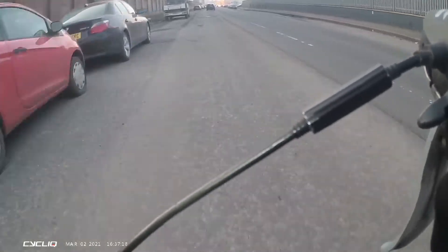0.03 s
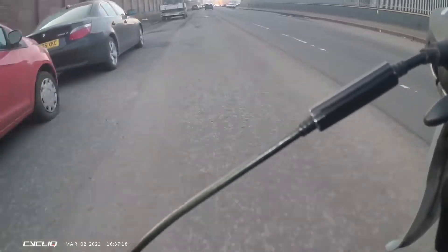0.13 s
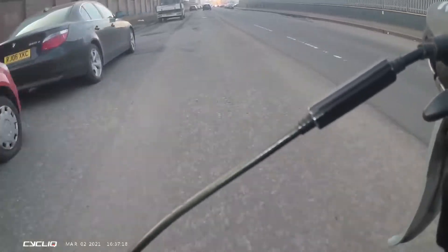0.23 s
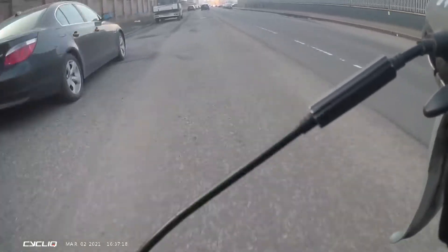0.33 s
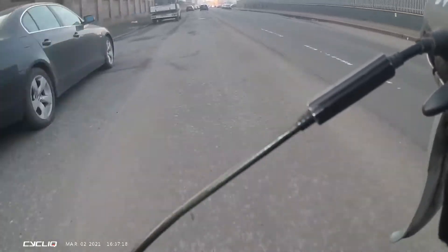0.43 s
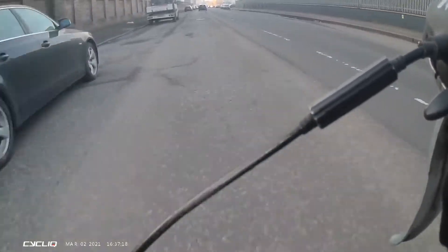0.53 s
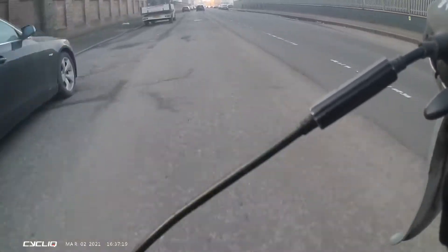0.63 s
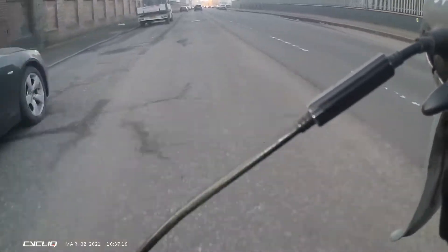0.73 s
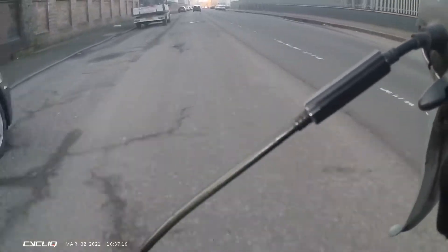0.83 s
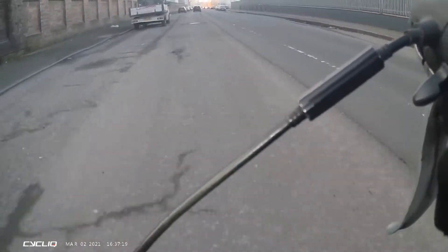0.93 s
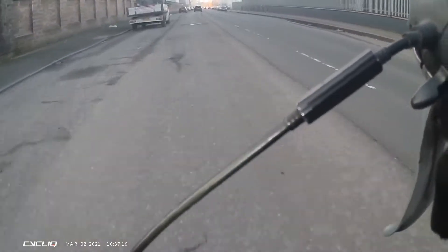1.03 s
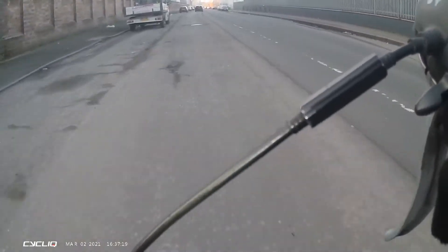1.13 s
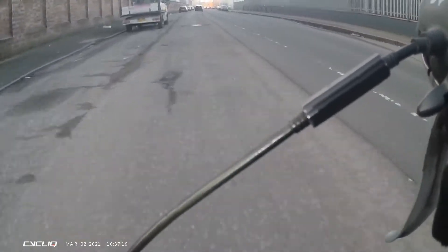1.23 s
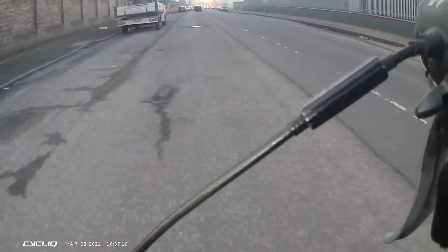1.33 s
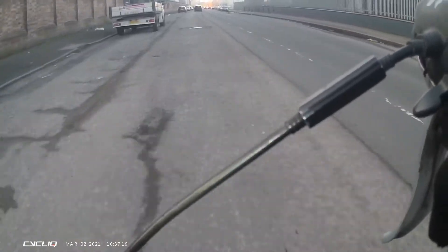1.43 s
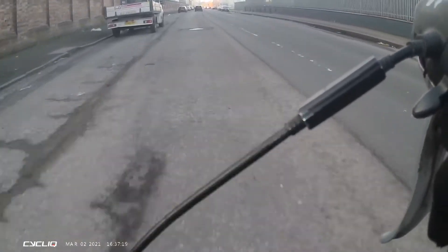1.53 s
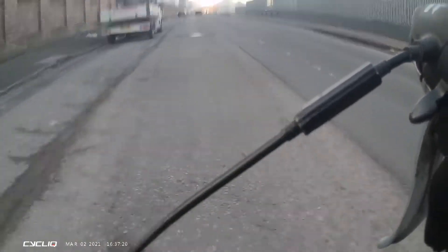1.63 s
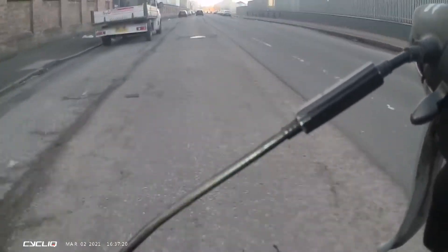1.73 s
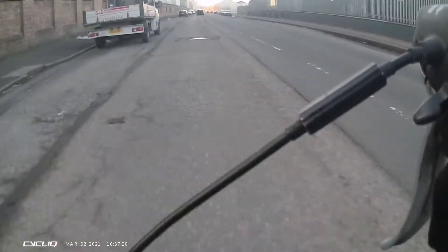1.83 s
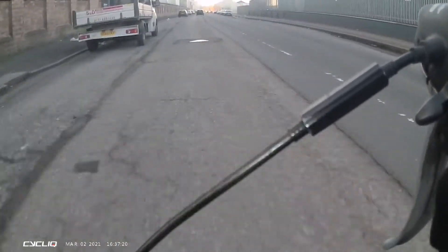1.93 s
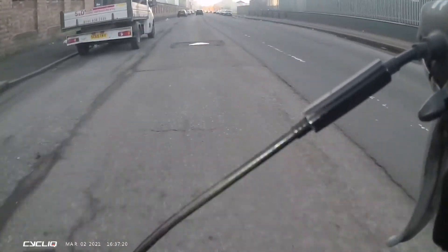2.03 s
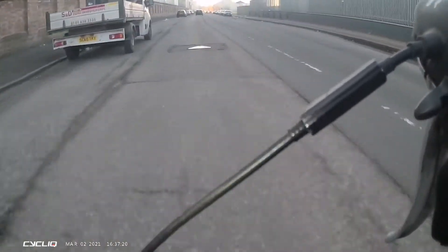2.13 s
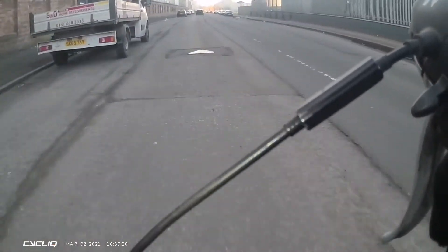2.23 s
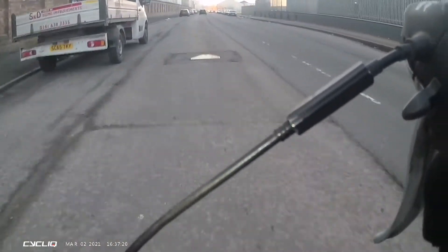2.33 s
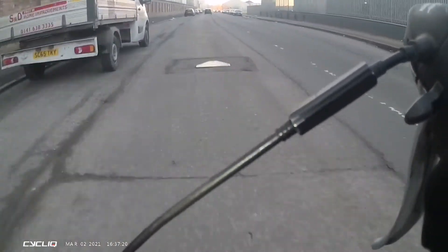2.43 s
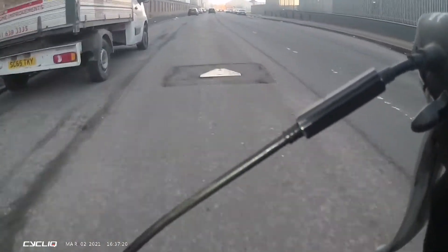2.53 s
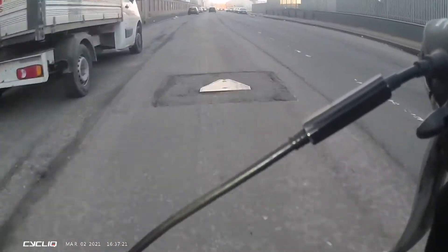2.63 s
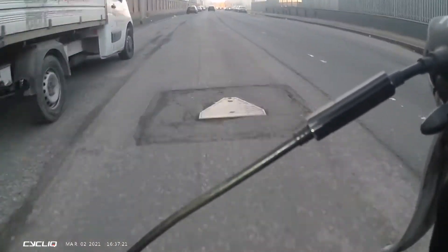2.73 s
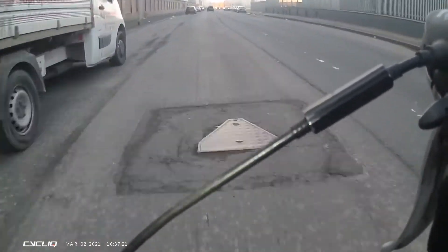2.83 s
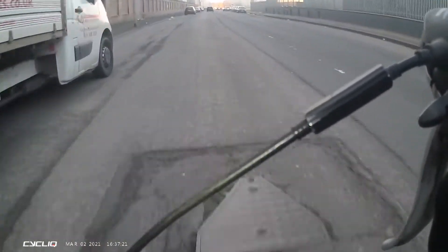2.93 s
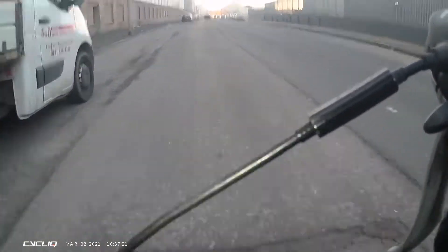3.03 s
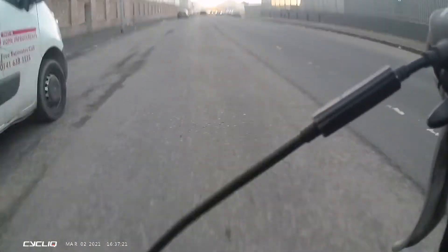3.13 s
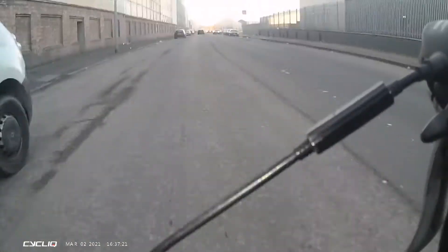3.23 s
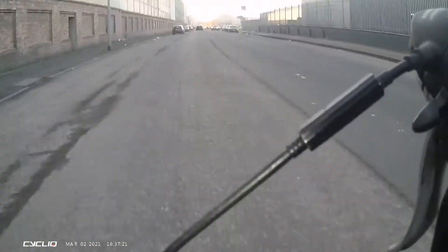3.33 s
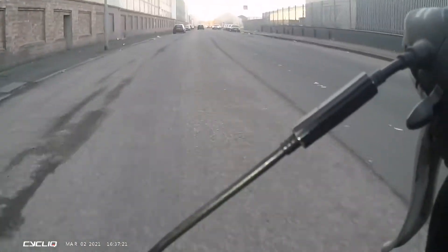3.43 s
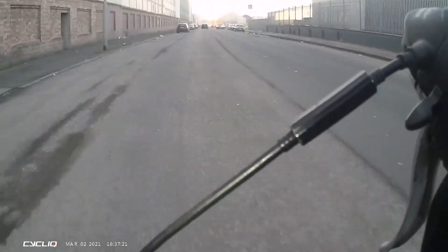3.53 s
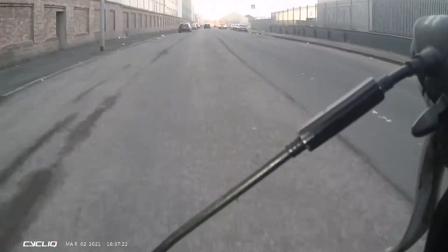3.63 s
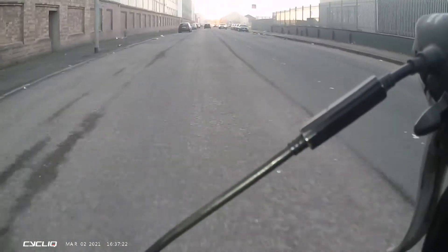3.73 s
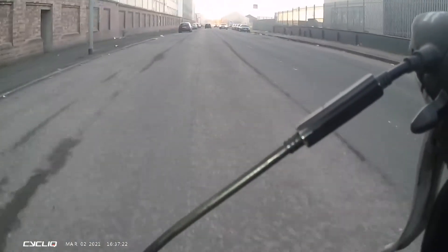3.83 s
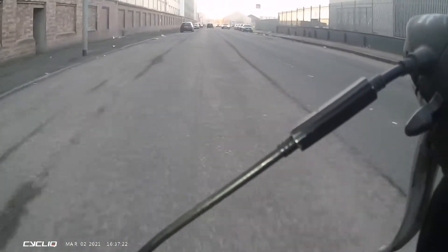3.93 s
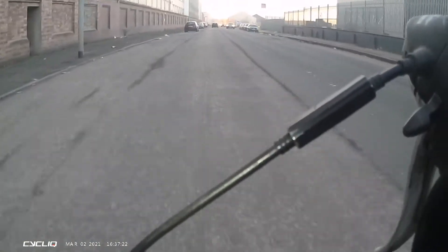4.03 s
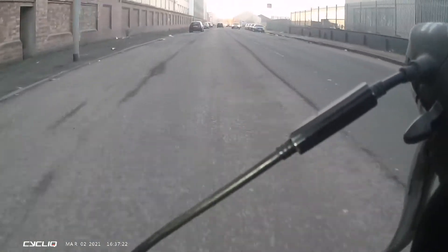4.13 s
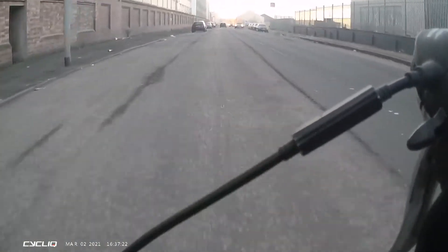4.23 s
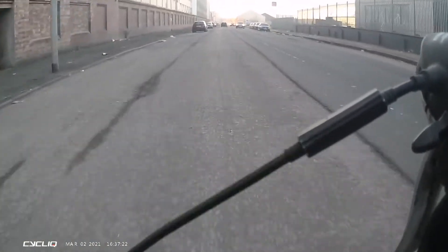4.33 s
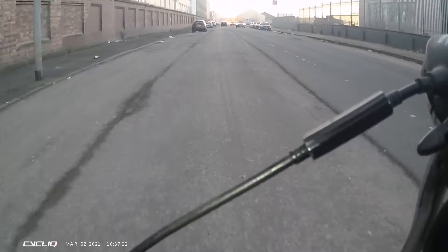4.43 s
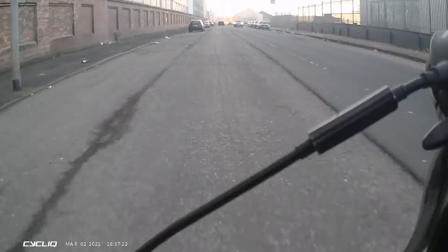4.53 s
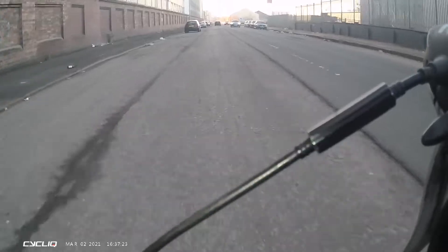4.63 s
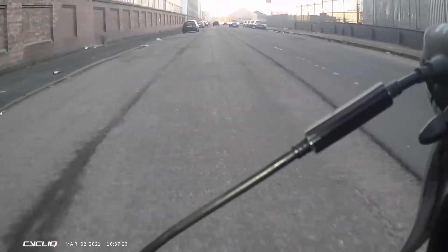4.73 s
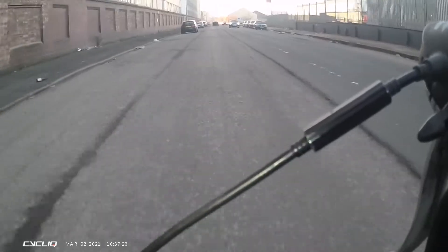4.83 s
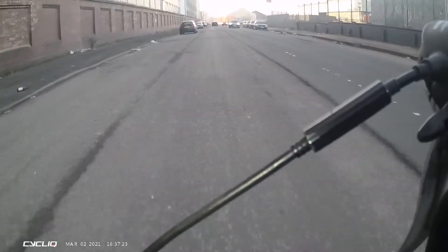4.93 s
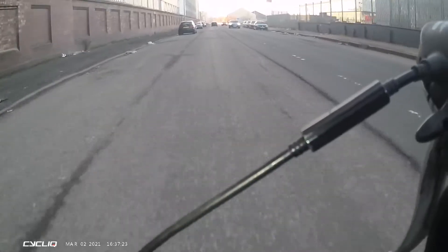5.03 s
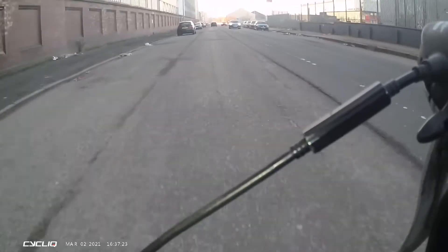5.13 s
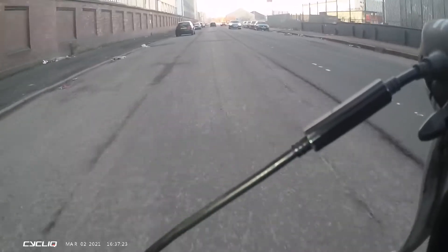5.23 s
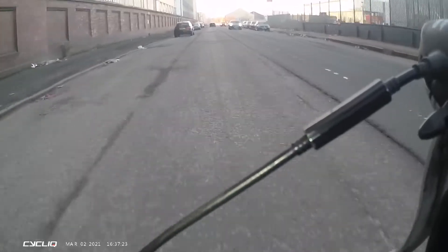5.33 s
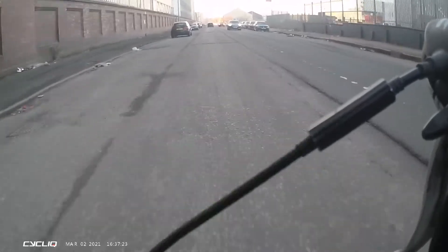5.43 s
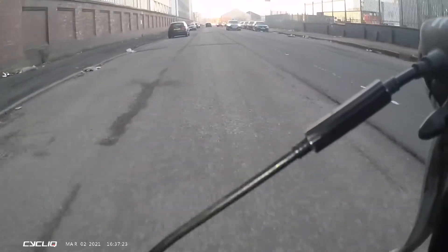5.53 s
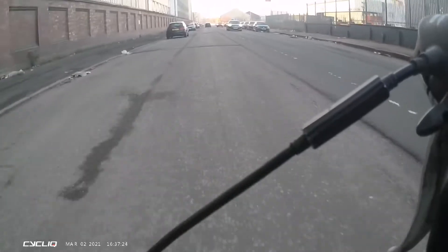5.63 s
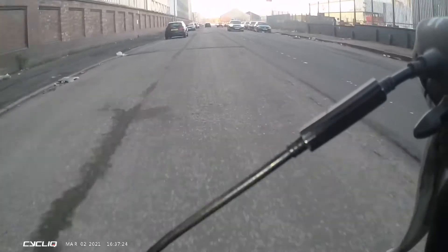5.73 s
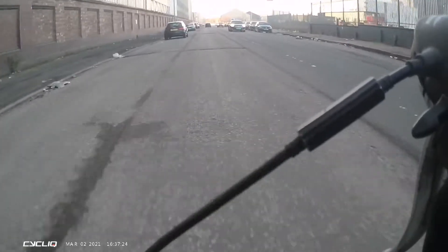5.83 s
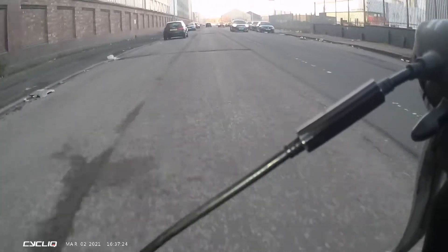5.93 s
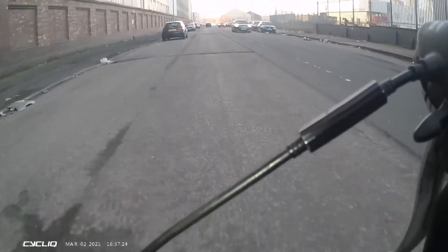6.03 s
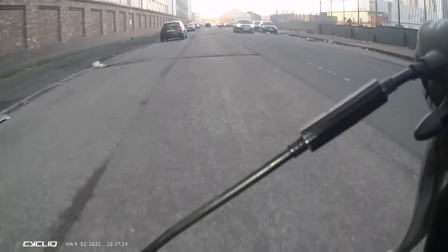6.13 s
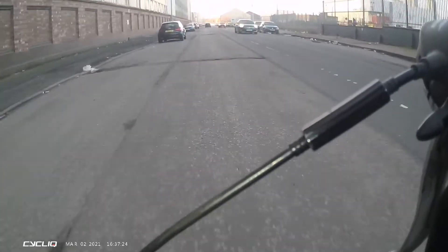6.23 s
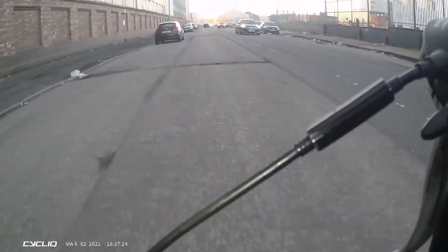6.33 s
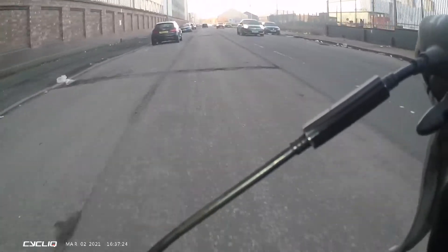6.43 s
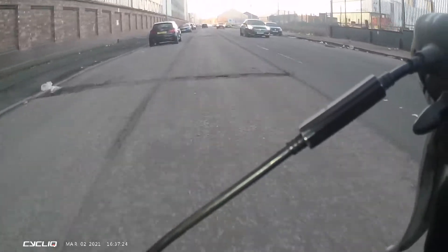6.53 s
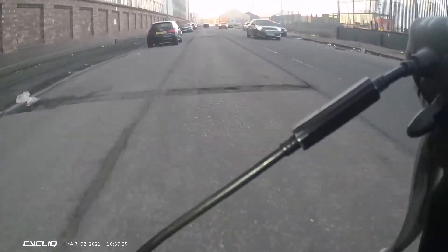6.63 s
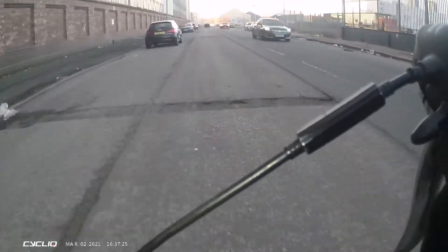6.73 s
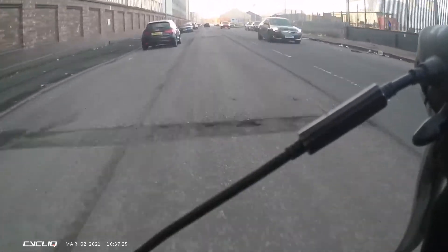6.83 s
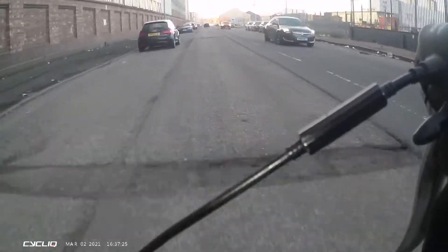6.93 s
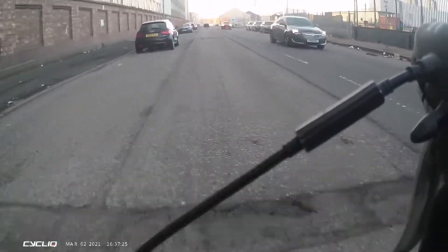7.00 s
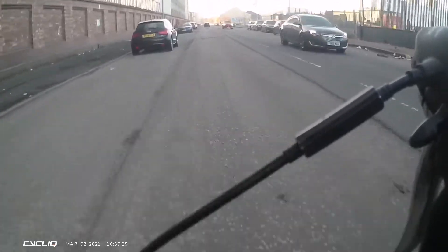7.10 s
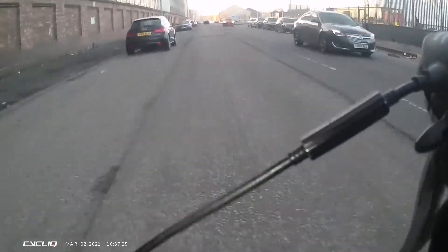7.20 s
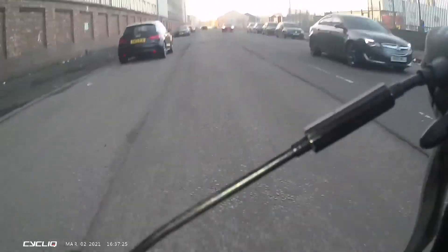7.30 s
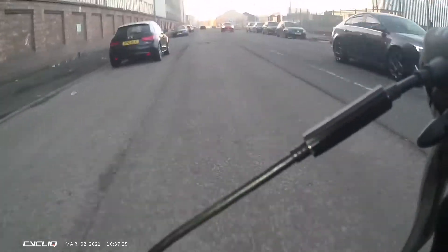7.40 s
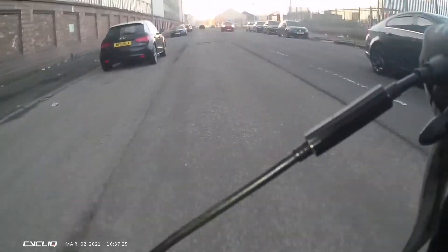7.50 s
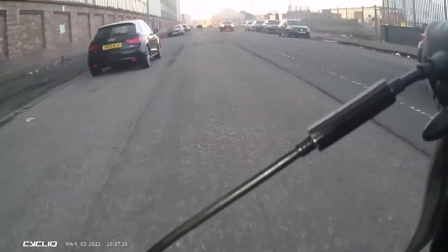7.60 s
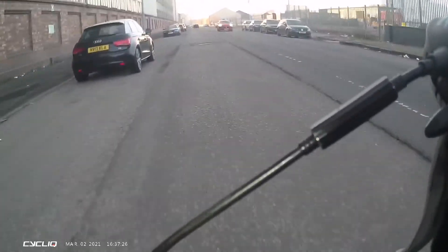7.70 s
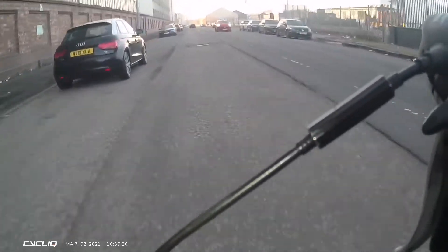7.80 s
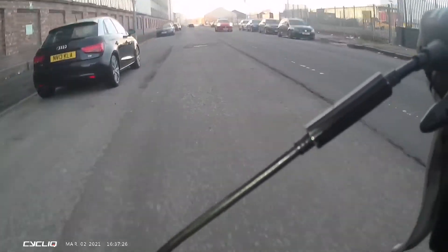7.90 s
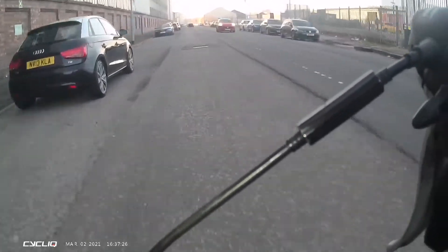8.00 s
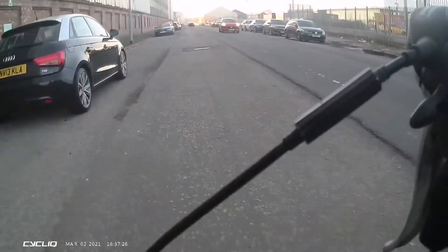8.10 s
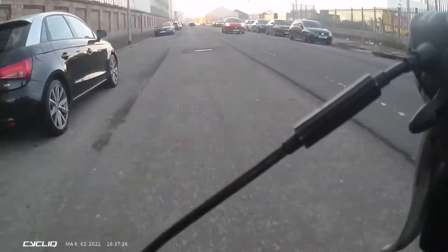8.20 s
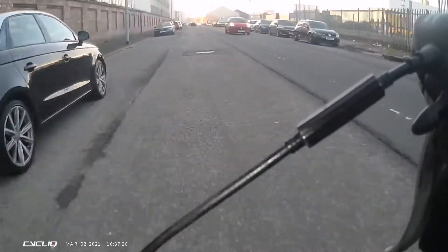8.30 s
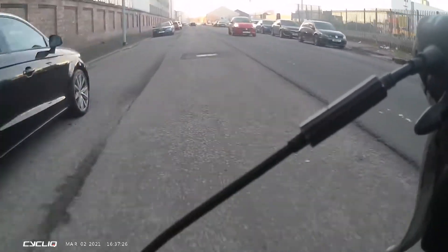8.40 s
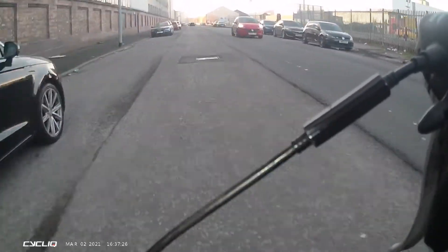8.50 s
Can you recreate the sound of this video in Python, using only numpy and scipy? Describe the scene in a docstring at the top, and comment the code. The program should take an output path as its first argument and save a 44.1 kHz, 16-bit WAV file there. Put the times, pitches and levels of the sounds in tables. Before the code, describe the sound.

A bicycle rolls steadily along a worn city street, heard close up from its handlebar. Tyres drum in a low, grainy rumble with a humming frame, finely buzzing fittings and lumpy low wind; a car's roar fades away at the start. After a faint tick at 0.4 s, a bump at 1.5-1.7 s brings thuds and sharp plastic clacks. Scattered jolts and ticks follow at 2.1-2.8 s, then the roughest stretch, 2.9-3.3 s, shakes the bike with heavy thumps, gritty crunch and rapid bright rattling. Smaller bumps come near 3.6 and 4.2 s, before mostly even rolling with slight roughness. From about 6 s an oncoming car gradually swells. A hard double-edged jolt at 7.1-7.3 s sets off another dense clatter, then a hollow loose knock at 7.5 s. The car is nearest around 7.7 s and recedes as the tyre drone continues to 8.5 s.

```python
"""A bicycle rolls on worn asphalt, heard at two microphone ports on its handlebar: stones drum on the tyres
and keep the frame droning. Rough patches raise the vibration, the buzz of fittings and the wind.
Edges ring the frame and set off clatter; fittings clack on the plastic mount and a loose part knocks.
Behind lie lumpy low wind noise and the roar of two oncoming cars, one fading, one swelling late.
Noise and random contacts drive spectra and ringing modes."""
import sys
import numpy as np
from scipy import signal
from scipy.fft import rfft, irfft, next_fast_len
from scipy.io import wavfile

SR = 44100
rng = np.random.default_rng(int(sys.argv[2]) if len(sys.argv) > 2 else 0)


def digitize_waveform(pressure):
    """Quantize a signal to 16-bit integers and store it at the path in sys.argv[1].

    Rows of a 2-D input are taken as channels; values are limited to [-1, 1].
    """
    field = np.atleast_2d(pressure).T
    bounded = np.clip(field, -1, 1)
    quanta = np.round(bounded * 32767).astype(np.int16)
    wavfile.write(sys.argv[1], SR, quanta)


N = 377496

# All dB values are relative to later layer gains.
# Tyre drumming spectrum: frequency_hz, density_db_per_hz
ROAD_SPECTRUM = [(70, -30), (120, -6), (150, -2.5), (200, -9), (270, -8.5), (330, -3.5), (400, 0),
                 (480, -3.5), (680, -15.5), (900, -18.5), (1200, -30), (2500, -36.5), (5000, -58)]
# Rough asphalt: start_s, length_s, extra_vibration_db
ROUGH_PATCHES = [(0.12, 0.3, 1.5), (1.05, 0.02, 3.5), (1.563, 0.13, 4.5), (2.036, 0.26, 1.5),
                 (2.587, 0.096, 3.5), (2.916, 0.36, 5), (3.574, 0.069, 4.5), (4.192, 0.059, 4.5),
                 (4.52, 0.16, 2.5), (5.427, 0.034, 2), (6.917, 0.075, 3.5), (7.092, 0.18, 6.5)]
# Fittings buzz spectrum: frequency_hz, density_db_per_hz
BUZZ_SPECTRUM = [(400, 6), (900, -7.5), (1600, 7.5), (2500, 3), (4100, 2.5), (4700, 7), (5500, 3.5),
                 (6400, 1), (8000, -4.5), (9700, -4), (12500, -15.5), (16000, -85)]
# Fittings striking the mount: start_s, level_db, chatter_s, pitch_hz
CLACKS = [(0.371, -30.5, 0.00077, 5100), (1.5755, -15, 0.002, 6500), (1.581, -8.5, 0.0026, 5500),
          (1.5995, -28, 0.00039, 5200), (1.6187, -24, 0.001, 6950), (1.620, -21, 0.0021, 3300),
          (1.689, -22, 0.0018, 5300), (1.7135, -21.5, 0.00075, 1980), (1.7136, -24, 0.002, 5570),
          (1.857, -24.5, 0.0007, 5830), (2.089, -13.5, 0.00088, 5550), (2.39, -19.5, 0.0013, 6600),
          (2.403, -33, 0.00099, 6900), (2.538, -23.5, 0.004, 4600), (2.608, -22, 0.0032, 4580),
          (2.652, -23, 0.0044, 4400), (2.7372, -24, 0.00027, 4840), (2.7422, -10.5, 0.001, 5670),
          (2.783, -20.5, 0.00031, 5660), (2.934, -7, 0.0025, 5800), (2.9627, -16, 0.0018, 7500),
          (2.974, -26, 0.0012, 2000), (2.994, -13, 0.0035, 4800), (3.0133, -23, 0.0014, 7600),
          (3.046, -13, 0.00073, 5600), (3.071, -10, 0.0019, 6150), (3.0788, -11, 0.0029, 5100),
          (3.09, -14, 0.0011, 5000), (3.113, -19.5, 0.00087, 4500), (3.118, -9.5, 0.00088, 6200),
          (3.1572, -12, 0.0018, 4930), (3.1893, -15.5, 0.0012, 6300), (3.206, -16, 0.00084, 5800),
          (3.2195, -6, 0.0018, 5900), (3.248, -17, 0.0026, 4370), (3.5534, -26.5, 0.0011, 6130),
          (4.442, -26, 0.00049, 5500), (4.685, -28, 0.00054, 4940), (6.934, -25, 0.001, 5440),
          (6.944, -25, 0.00058, 5430), (7.1029, -8.5, 0.002, 7240), (7.118, -16, 0.001, 5000),
          (7.18, -10.5, 0.0034, 5040), (7.2128, -17, 0.0014, 5500), (7.225, -16, 0.004, 6000),
          (7.2437, -7.5, 0.0018, 6000), (7.2495, -8, 0.0023, 4840), (7.256, -10.5, 0.00067, 5000),
          (7.297, -19, 0.00095, 5740), (7.301, -22, 0.002, 4600), (7.3345, -18.5, 0.00028, 5000)]
# Plastic mount and housing: frequency_hz, level_db, t60_s, left_lead_rad
MOUNT_MODES = [(4180, 5.5, 0.0042, 0.91), (4880, 13, 0.0011, 1.7), (5900, 13, 0.0046, 3),
               (7200, 11.5, 0.0032, 3.2), (8900, 0, 0.002, 1.23), (11300, -25, 0.0069, 1.6)]
# Bracket, the body of each clack: frequency_hz, level_db, t60_s
BRACKET_MODES = [(960, -7, 0.0039), (1770, -15, 0.0015), (2640, -11.5, 0.0076)]
# Edges and broken spots under the front wheel: start_s, thump_db, crunch_db
EDGES = [(1.499, -17, -37), (1.575, -5.5, -26.5), (1.586, -4.5, -30), (1.617, -3.5, -29.5),
         (1.653, -11.5, -48), (2.088, -14.5, -36), (2.254, -14, -33.5), (2.588, -13.5, -32.5),
         (2.936, -22, -21.5), (2.969, -3.5, -19.5), (2.992, -11, -21.5), (3.012, -3.5, -29),
         (3.042, -11, -24), (3.078, -4, -21), (3.59, -10.5, -34.5), (4.198, -27, -34), (4.222, -8.5, -51),
         (7.103, -1.5, -17), (7.127, -7, -23), (7.149, -7, -31), (7.17, -8.5, -27), (7.211, -6, -27.5),
         (7.287, -11, -26.5)]
# Frame and handlebar: frequency_hz, level_db, t60_s
FRAME_MODES = [(43.7, -6.5, 0.13), (163, -0.5, 0.029), (227.4, -1, 0.055), (293, -10.5, 0.09),
               (448, 2, 0.012), (770, -12, 0.0039)]
# Gritty clatter spectrum: frequency_hz, density_db_per_hz
CRUNCH_SPECTRUM = [(200, 17.5), (550, 2.5), (1100, 5.5), (1900, 1.5), (3300, 4.5), (5500, 6.5),
                   (9000, -6.5), (16000, -15)]
# Loose part knocking: start_s, level_db
KNOCKS = [(7.513, -7.5), (7.515, -7), (7.5212, -11)]
# Ring of the knock: frequency_hz, level_db, t60_s
KNOCK_MODES = [(500, -0.5, 0.018), (2860, -5, 0.0017), (5300, -12, 0.0034)]
# Wind spectrum: frequency_hz, density_db_per_hz
WIND_SPECTRUM = [(15, -38), (25, -3), (40, 1.5), (60, 4), (78, -2), (95, 5), (120, -13), (200, -10.5),
                 (1200, -77)]
# Wind strength curve: time_s, level_db
BREEZE = [(0, -27.5), (1.0, -28.5), (1.62, -25), (2.4, -24), (3.4, -32), (3.7, -25.5), (4.2, -25.5),
          (5.0, -26), (7.3, -27), (8.56, -27.5)]
# Car tyre spectrum: frequency_hz, density_db_per_hz
CAR_SPECTRUM = [(100, -1.5), (400, 1), (700, -4), (920, -1.5), (1250, -8.5), (3000, -19), (5000, -28),
                (9000, -28.5), (15000, -60)]
# Oncoming cars: nearest_s, level_at_nearest_db
CARS = [(-0.5, -39.5), (7.68, -32.5)]
# Likeness of the two ports: frequency_hz, correlation (no unit)
PORT_LIKENESS = [(40, 0.88), (150, 0.91), (220, 0.42), (330, 0.98), (1000, 0.79), (2100, 0.74), (3100, 0.4),
                 (4200, 0.55), (5400, 0.78), (6500, 0.77), (8500, 0.00074), (14000, 0.082)]

# Smooth asphalt: levels at the start and their steady rise
FRAME_DB, BUZZ_DB, RISE_DB_PER_S = -28, -51.5, 0.16
BAR_HZ, BAR_T60_S, BAR_DB = 330.6, 0.052, -5
SHAKE_ATTACK_S, SHAKE_RELEASE_S = 0.013, 0.036
BUZZ_DB_PER_SHAKE_DB, WIND_DB_PER_SHAKE_DB = 1.9, 1
ONSET_LEAD_S, ONSET_LOSS_DB = 0.0045, 19  # a faint soft onset leads each clack
PART_DB, PART_Q = 14.5, 6
HOUSING_T60_S = 0.04
WHEELBASE_M, SPEED_M_PER_S = 1.05, 7.6
REAR_LOSS_DB, REAR_CRUNCH_LOSS_DB = 8.5, 12.5
CRUNCH_S, REBOUND_S = 0.012, 0.0045  # clatter decay; mean time between rebounds
LANE_DISTANCE_M, CLOSING_M_PER_S, CAR_FALL_DB_PER_DECADE = 9.1, 12.4, 24
CUTOFF_HZ = 16700
DRIFT_STEP = 40  # samples between points of a slow drift


def tyres(frame_db, texture):
    """Stones drum on the tyres and keep the handlebar's main mode sounding."""
    stones = rms_one(at_ports(grains(per_s=2500, spread_db=2.5), ROAD_SPECTRUM))
    bar = rms_one(ring(stones, BAR_HZ, BAR_T60_S))
    shudder = rms_one(ring(stones, 289.0, 0.011))
    usual_db = np.median(frame_db)
    extra_db = frame_db - usual_db
    stones_db = -1.0 + 1.03 * extra_db + 1.2 * texture
    bar_db = BAR_DB + 0.1 * extra_db + 1.0 * texture  # the hands damp its larger swings
    shudder_db = -11.0 + 1.8 * extra_db  # the mount gives way mostly under hard shaking
    frame = stones * from_db(stones_db) + bar * from_db(bar_db) + shudder * from_db(shudder_db)
    return frame * from_db(usual_db) * pan(3.27)


def shaking():
    """Extra vibration in dB: builds quickly on each rough patch, holds, settles after it."""
    t, extra_db = np.arange(N) / SR, np.zeros(N)
    for start_s, length_s, patch_db in ROUGH_PATCHES:
        attack = np.clip((t - start_s) / SHAKE_ATTACK_S, 0, 1)
        release = np.exp(-np.maximum(t - start_s - length_s, 0) / SHAKE_RELEASE_S)
        extra_db = np.maximum(extra_db, patch_db * attack * release)
    return extra_db


def jolts():
    """The tyre softens each edge into a short push that rings the frame."""
    hits = blows([(s, thump_db) for s, thump_db, _ in wheel_hits()])
    push = lowpass(hits, 1500, order=1)
    return from_db(-2.5) * modes(push, FRAME_MODES, alternate=True) * pan(0.48)


def wheel_hits():
    """Front then rear hits, one wheelbase of travel apart, the rear weaker: (s, thump dB, crunch dB)."""
    lag_s = WHEELBASE_M / SPEED_M_PER_S
    rear = [(s + lag_s, thump_db - REAR_LOSS_DB, crunch_db - REAR_CRUNCH_LOSS_DB)
            for s, thump_db, crunch_db in EDGES]
    return list(EDGES) + rear


def crunches():
    """Broken asphalt sets off a broad clatter, a quick run of rebounds."""
    bursts = [(s, crunch_db, flurry(CRUNCH_S, contact_share=0.2, rise=0.15))
              for s, _, crunch_db in wheel_hits()]
    force = placed(bursts) * rebounds()
    return from_db(27.5) * at_ports(force, CRUNCH_SPECTRUM) * pan(1.0)


def rebounds():
    """Contact of a rattling part: brief uneven touches with gaps between; rms 1."""
    chance = rng.random((N // 40, 2))
    times_s = np.cumsum(REBOUND_S * (.5 + chance[:, 0]))
    levels_db = 6 * chance[:, 1]
    touches = blows([(s, db) for s, db in zip(times_s, levels_db) if s * SR < N - 1])
    touch_shape = signal.windows.gaussian(SR // 150, SR / 1100)
    return rms_one(np.convolve(touches, touch_shape, "same"))


def clacks():
    """Parts chatter on the mount at their own pitch; hard blows add a bright crack."""
    onsets = [(s - ONSET_LEAD_S, db - ONSET_LOSS_DB, chatter_s, hz) for s, db, chatter_s, hz in CLACKS]
    runs = [(s, db, flurry(chatter_s, contact_share=0.46, rise=1.0), hz)
            for s, db, chatter_s, hz in onsets + list(CLACKS)]
    force = placed([(s, db, run) for s, db, run, _ in runs])
    parts = at_ports(placed([(s, db, part_ring(run, hz)) for s, db, run, hz in runs]))
    soft = placed([(s, db, softened(run, hz)) for s, db, run, hz in runs])[0]

    hard = force * np.minimum(3.5 * force ** 2, .2)  # favours strong contacts
    crack_band = signal.butter(2, [7500, 12500], "band", fs=SR, output="sos")
    mid, side = signal.sosfilt(crack_band, hard)
    crack = mid + 0.74 * side * [[1], [-1]]

    body = modes(soft, BRACKET_MODES, alternate=True)
    plastic = from_db(-5.0) * mount(soft) + body
    plastic = plastic + from_db(PART_DB) * parts + from_db(39) * crack
    return (plastic + from_db(-20) * housing(plastic)) * pan(-2.5)


def part_ring(run, hz):
    """The touching cable or lever resonates a few cycles at its own pitch; unit energy."""
    rung = signal.lfilter(*signal.iirpeak(hz, max(PART_Q, 1), fs=SR), softened(run, hz))
    return rung / np.linalg.norm(rung[0])


def softened(run, hz):
    """Lower-pitched parts are softer and give a duller blow."""
    return lowpass(run, min(1.4 * hz, SR / 4), order=2)


def mount(force):
    """Housing modes ring briefly; phase leads set the ports moving against each other."""
    out = np.zeros((2, N))
    for k, (hz, level_db, t60_s, lead_rad) in enumerate(MOUNT_MODES):
        wander_db = 2.9 * drift(67)  # the point of contact wanders
        push = force * from_db(level_db + wander_db) * (-1) ** k
        out += [ring(push, hz, t60_s, lead_rad / 2), ring(push, hz, t60_s, -lead_rad / 2)]
    return out


def housing(x):
    """Reflections inside the housing smear each contact with a 40 ms decaying noise tail."""
    t = np.arange(SR // 25) / SR
    tail = rng.standard_normal((2, len(t))) * from_db(-60 * t / HOUSING_T60_S)
    return signal.fftconvolve(x, tail / np.linalg.norm(tail[0]), axes=1)[:, :N]


def knock():
    """A loose part knocks and rebounds with soft contact, ringing hollow."""
    push = lowpass(blows(KNOCKS), 4000, order=2)
    return modes(push, KNOCK_MODES) * pan(1.0)


def fittings(buzz_db, texture):
    """Cables and levers buzz in little flurries: fine contacts plus ticks on the mount."""
    fine = rms_one(at_ports(grains(per_s=2800, spread_db=2.5), BUZZ_SPECTRUM))
    ticks = mount(grains(per_s=600, spread_db=3.8)[0])
    ticks = rms_one(ticks + 0.1 * housing(ticks))
    buzz = from_db(2.5) * fine + from_db(-2.0) * ticks
    return buzz * from_db(buzz_db + 2.0 * texture) * pan(-0.1)


def grit(buzz_db):
    """Loose grit flicks the bike; separate grains ring each bracket mode."""
    rings = sum(ring(grains(per_s=130, spread_db=3.0), hz, t60_s) * from_db(level_db)
                for hz, level_db, t60_s in BRACKET_MODES)
    return rms_one(at_ports(rings)) * from_db(buzz_db - 5.5)


def wind(shake_db):
    """Lumpy low turbulence on the ports, stronger under shaking."""
    breeze_db, = in_time(BREEZE)
    lumps_db = 1.0 * drift(6)
    level_db = breeze_db + WIND_DB_PER_SHAKE_DB * shake_db + lumps_db - 2.1
    return at_ports(rng.standard_normal((2, N)), WIND_SPECTRUM) * from_db(level_db) * pan(1.3)


def traffic():
    """Smooth roar of car tyres, slightly to the right, swelling and fading with distance."""
    t, power = np.arange(N) / SR, 0
    for nearest_s, nearest_db in CARS:
        distance_m = np.hypot(LANE_DISTANCE_M, CLOSING_M_PER_S * (t - nearest_s))
        fall_db = CAR_FALL_DB_PER_DECADE * np.log10(distance_m / LANE_DISTANCE_M)
        power = power + from_db(nearest_db - fall_db) ** 2
    return at_ports(rng.standard_normal((2, N)), CAR_SPECTRUM) * np.sqrt(power) * pan(-0.23)


def from_db(db):
    """Decibels to amplitude gain."""
    return 10 ** (np.asarray(db) / 20)


def rms_one(x):
    """Scale to unit rms."""
    return x / np.sqrt(np.mean(x ** 2) + 1e-20)


def lowpass(x, hz, order):
    """Butterworth softening of a contact."""
    return signal.sosfilt(signal.butter(order, hz, fs=SR, output="sos"), x)


def in_time(rows):
    """Each column of a time curve at every sample."""
    times_s, *columns = np.transpose(rows)
    return [np.interp(np.arange(N) / SR, times_s, column) for column in columns]


def at_hz(points, hz):
    """Read a spectrum on a log-frequency axis."""
    known_hz, values = np.transpose(points)
    return np.interp(np.log(hz + 1), np.log(known_hz), values)


def drift(rate_hz):
    """Slow random wander of about unit rms: noise through two equal poles at rate_hz."""
    pole = np.exp(-2 * np.pi * rate_hz * DRIFT_STEP / SR)
    noise = rng.standard_normal(N // DRIFT_STEP + 2002)
    slow = signal.lfilter([1], [1, -2 * pole, pole * pole], noise)[2000:]  # drop the settling
    return np.interp(np.arange(N) / DRIFT_STEP, np.arange(len(slow)), rms_one(slow))


def pan(left_db):
    """Gains of the two channels, left_db apart."""
    return from_db(np.array([[.5], [-.5]]) * left_db)


def ring(force, hz, t60_s, phase_rad=0):
    """Damped resonator: a unit click starts a sine of height 1."""
    decay, w = from_db(-60 / (t60_s * SR)), 2 * np.pi * hz / SR
    start = [np.sin(phase_rad), decay * np.sin(w - phase_rad)]
    return signal.lfilter(start, [1, -2 * decay * np.cos(w), decay * decay], force + 1e-18)


def modes(push, table, alternate=False):
    """Sum of modes rung by one push, optionally of alternating sign."""
    sign = -1 if alternate else 1
    return sum(ring(push, hz, t60_s) * from_db(level_db) * sign ** k
               for k, (hz, level_db, t60_s) in enumerate(table))


def at_ports(pair, spectrum=None):
    """Mix two unrelated signals into partly alike channels, coloured if asked, at the same power."""
    size = next_fast_len(N)
    hz = np.arange(size // 2 + 1) * SR / size
    alike = np.clip(at_hz(PORT_LIKENESS, hz), -1, 1)
    colour = 1 if spectrum is None else from_db(at_hz(spectrum, hz))
    mid, side = rfft(pair, size) * colour * np.sqrt([1 + alike, 1 - alike])
    channels = irfft([mid + side, mid - side], size)[:, :N]
    return rms_one(channels) * np.std(pair)


def blows(rows):
    """One click for each (s, dB) row."""
    force = np.zeros(N)
    for s, level_db in rows:
        force[round(s * SR)] += from_db(level_db)
    return force


def grains(per_s, spread_db):
    """Two random trains of tiny contacts of uneven size and either sign."""
    sizes = from_db(spread_db * np.minimum(rng.exponential(1, (2, N)), 4))
    present = rng.random((2, N)) < per_s / SR
    return present * sizes * rng.choice([-1, 1], (2, N))


def flurry(length_s, contact_share, rise):
    """Uneven contacts that swell and die away; unit energy; rise is relative to the decay time."""
    age = np.arange(SR // 8) / SR / max(length_s, 3e-4)
    swell = np.exp(-age) * (1 - np.exp(-age / rise))
    touching = rng.random((2, len(age))) < contact_share
    run = swell * rng.standard_normal((2, len(age))) * touching
    return run / (np.linalg.norm(run, axis=1, keepdims=True) + 1e-12)


def placed(bursts):
    """Lay (s, dB, signal pair) bursts on the time line."""
    out = np.zeros((2, N + SR))
    for s, level_db, burst in bursts:
        at = round(s * SR)
        out[:, at:at + burst.shape[1]] += from_db(level_db) * burst
    return out[:, :N]


def scene():
    """The same rough patches drive the frame, its fittings and the wind."""
    shake_db, rise_db = shaking(), RISE_DB_PER_S * np.arange(N) / SR
    texture = 1.42 * drift(38.0) + .5 * drift(28)
    frame = tyres(FRAME_DB + rise_db + shake_db, texture)
    buzz_db = BUZZ_DB + rise_db + BUZZ_DB_PER_SHAKE_DB * shake_db
    buzz = fittings(buzz_db, texture) + grit(buzz_db)
    bike = frame + jolts() + crunches() + clacks() + knock() + buzz
    return bike + wind(shake_db) + traffic()


def record(dry):
    """Clip at full scale, then cut the top: 55 dB down from CUTOFF_HZ up."""
    top_cut = signal.cheby2(14, 55, CUTOFF_HZ, fs=SR, output="sos")
    return signal.sosfilt(top_cut, np.clip(dry, -1, 1))


dry = scene()
out = record(dry)
digitize_waveform(out)
```